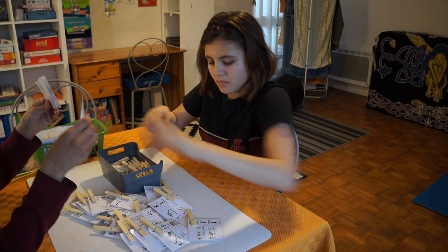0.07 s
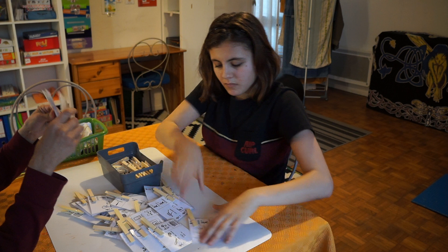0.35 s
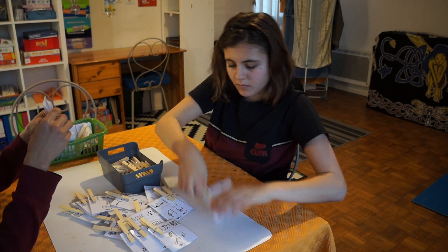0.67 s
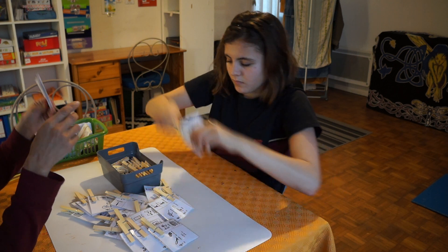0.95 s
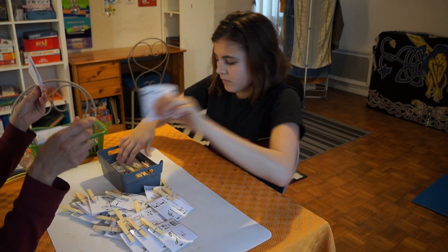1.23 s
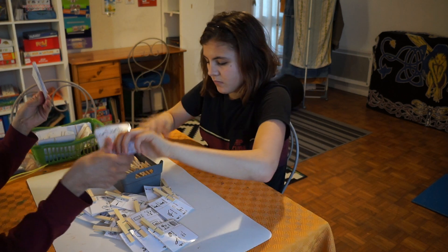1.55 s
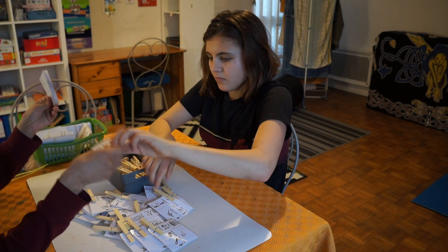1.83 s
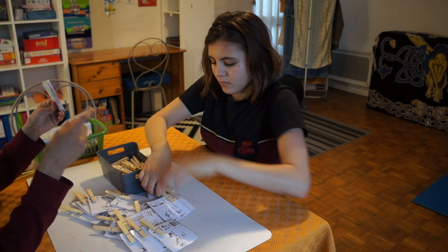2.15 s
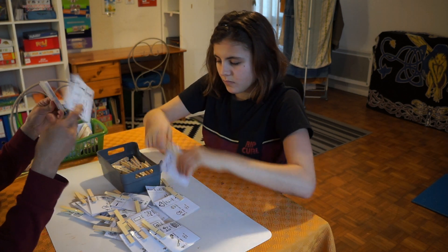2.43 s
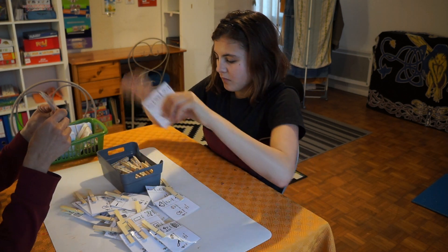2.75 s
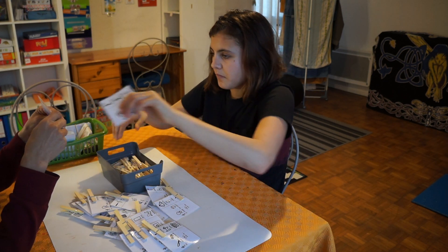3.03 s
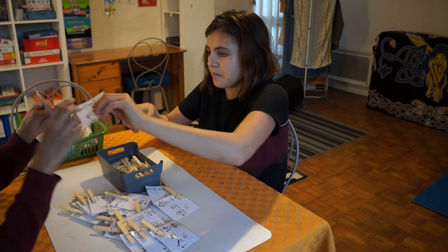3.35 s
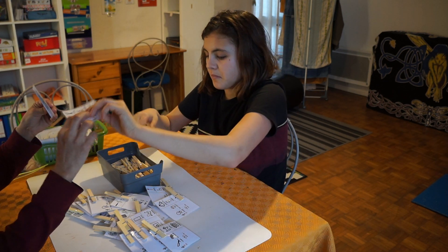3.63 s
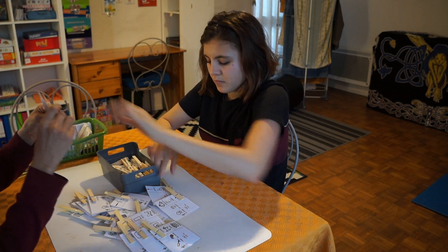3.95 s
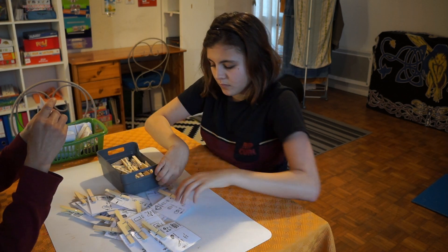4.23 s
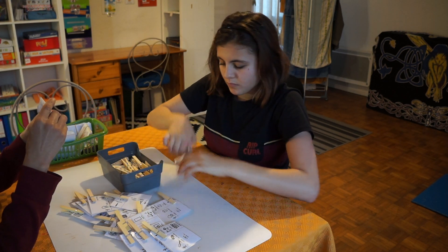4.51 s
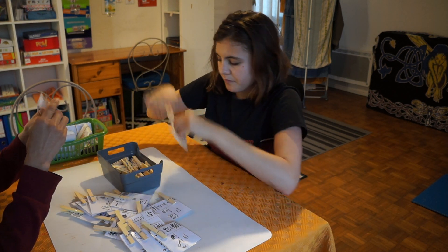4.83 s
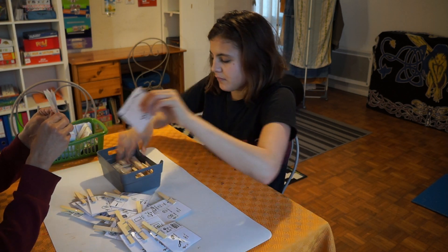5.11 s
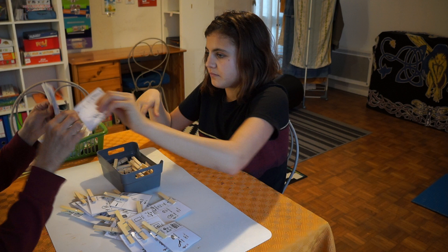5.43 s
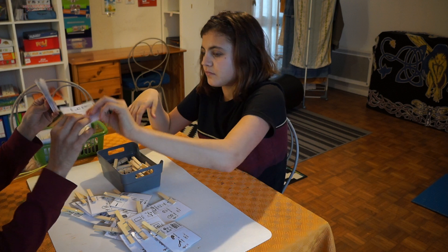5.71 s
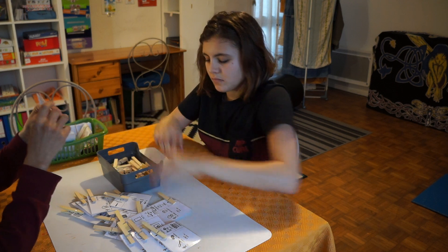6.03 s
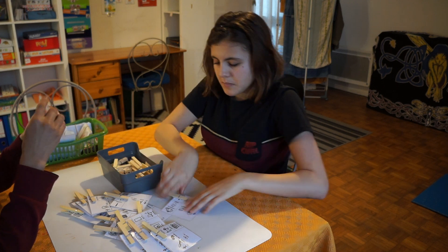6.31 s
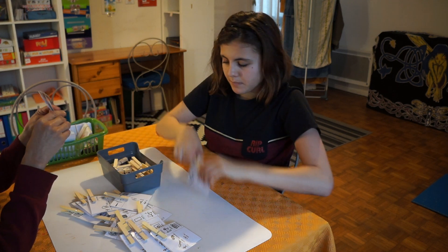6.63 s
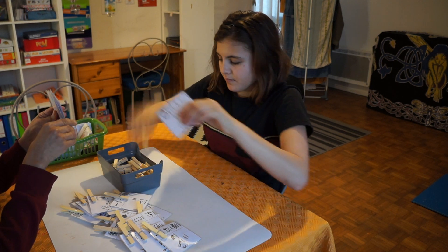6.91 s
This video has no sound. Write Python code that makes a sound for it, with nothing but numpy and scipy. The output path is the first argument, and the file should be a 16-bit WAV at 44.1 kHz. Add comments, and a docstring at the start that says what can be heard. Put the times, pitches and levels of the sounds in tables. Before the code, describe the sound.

Paper cards slide and flex softly as wooden clothespins are unclipped, their jaws clicking shut, once with a bright spring ping. The pegs land in a small plastic box in four main bursts of sharp clacks, hollow knocks and brief rattles, with more card handling in between. The microphone picks it up in narrow stereo, a touch to the left, with light living room reverberation over a faint low rumble and hiss.

```python
"""A live living room, at a table: wooden clothespins are unclipped from paper cards and dropped into a
small plastic box of pegs. Each drop clacks on the pegs, rings the box and thuds into the table; loose
pegs rock and settle. Between drops, cards slide with a grainy hiss and buckle with a hollow pop, jaws
click shut, and twice a steel spring pings. The room answers each sound, in narrow stereo."""
import sys
import numpy as np
from scipy import signal
from scipy.fft import rfft, irfft, next_fast_len
from scipy.io import wavfile
from scipy.ndimage import uniform_filter1d, map_coordinates

SR = 44100
rng = np.random.default_rng(int(sys.argv[2]) if len(sys.argv) > 2 else 0)


def transcribe(u):
    """Save the signal u as a 16-bit wav file named by the first command-line argument.

    u: samples, shape (n,) or (channels, n), limited to [-1, 1]; the rate is SR.
    q: integer samples, one column per channel.
    """
    v = np.clip(np.atleast_2d(u).T, -1, 1)
    q = np.round(v * 32767).astype(np.int16)
    wavfile.write(sys.argv[1], SR, q)


N = 315756
GRID_HZ = np.fft.rfftfreq(8192, 1 / SR)

# Levels in a table are relative; each source adds its own gain.
# room tone: freq_hz, level_db
ROOM_TONE = [(12, -33), (20, -18), (69, -4), (157, -9.5), (227, -6), (280, -6.5), (439, -8.5), (688, -17),
             (745, -8.5), (806, -12), (1110, -12), (5540, -18.5), (8670, -15), (11000, -24), (14300, -85),
             (22000, -120)]
# room tone width: freq_hz, side_re_mid_db
ROOM_TONE_WIDTH = [(60, -40), (110, -8), (190, -7), (350, -2), (620, 7), (1110, 4), (1990, 2.5),
                   (3570, -2.5), (6390, -8), (11500, -8)]
# reverberation: freq_hz, t60_s
ROOM_DECAY = [(120, 0.438), (400, 0.69), (1200, 0.41), (3000, 0.44), (7000, 0.395), (11000, 0.31)]

# landings: start_s, level_db, hardness (0 sinks to the floor, 1 wood on wood), thud_re_walls_db
DROPS = [(0.0024, -23, 0.12, -18), (1.2494, -13.5, 1, -26.5), (1.2654, -13, .55, -23),
         (1.3214, -19.5, 0.43, -35), (1.5124, -18.5, 0.34, -29), (1.5324, -20.5, 0.64, -19.5),
         (2.8946, -10.5, 0.72, -17.5), (3.0378, -10, 0.54, -38), (3.0744, -17, 0.54, -22),
         (3.0963, -15, 0.61, -30), (5.1064, -12.5, 0.94, -25), (5.1134, -20.5, 0.84, -11.5),
         (5.2214, -17, .05, -44), (5.242, -11.5, 0.45, -38), (5.328, -27, 0.57, -19),
         (7.0044, -15, .85, -16), (7.009, -13, 0.95, -16.5), (7.0239, -16, 0.85, -23.5),
         (7.0436, -16, 0.56, -41), (7.1053, -12.5, 0.29, -30), (7.1497, -18, 0.44, -27)]
# box wall modes: freq_hz, width_hz, level_db
BOX_WALL_MODES = [(930, 27, -8), (985, 143, 2), (1109, 30, 7.5), (1188, 300, 1.5), (1437, 220, 5),
                  (1480, 156, -3.5), (1670, 140, 1), (1796, 140, -0.5), (1996, 410, -2), (2280, 127, -13)]
# box floor modes: freq_hz, width_hz, level_db
BOX_FLOOR_MODES = [(536.3, 75, -10.5), (632.5, 63, -1), (688, 64, 1), (779.5, 65, 2.5), (890, 146, 1)]
# peg contact: freq_hz, level_db
PEG_SPECTRUM = [(60, -89), (300, -20.5), (1000, -11.5), (2000, 3), (3500, 1.5), (4500, 1.5), (5500, 0.5),
                (7200, 3), (8500, 2), (11000, -10.5)]
# table thud under the box: freq_hz, level_db
THUD_SPECTRUM = [(30, -50), (80, -37), (108, -11), (133, 2.5), (165, -5.5), (235, -4), (340, -0.5),
                 (480, -5), (900, -39), (3000, -63.5)]

# card over the table or out of a peg's jaws: start_s, length_s, level_db, scrape_db (high when pressed)
STROKES = [(0.08, 0.12, -60.5, -10), (0.35, 0.13, -51.5, -0.5), (0.494, 0.35, -49, -1.5),
           (0.975, 0.051, -43, -19), (1.116, 0.12, -57, -12), (1.78, 0.15, -51, -8), (2.047, .38, -54.5, 3),
           (2.57, 0.11, -52, -4.5), (3.696, .2, -54, -11), (4.095, 0.51, -49, 0.5),
           (4.716, 0.24, -54, -7.5), (5.737, 0.15, -57, -20), (5.862, 0.095, -50, 7.5),
           (6.0, 0.21, -56.5, -6), (6.197, 0.11, -45.5, 5), (6.322, 0.43, -44.5, -2)]
# card face: freq_hz, level_db
HISS_SPECTRUM = [(800, -41), (2500, -8.5), (4000, -3), (5500, -3.5), (8000, 2.5), (9500, -6.5),
                 (11000, -14)]
# card body: freq_hz, level_db
SCRAPE_SPECTRUM = [(50, -12), (140, -4.5), (400, -6), (900, 2.5), (2000, 3), (3200, 1), (7000, -28)]

# pegs clicking in the hand: start_s, level_db, wood_hz, knock_db, tilt_db_per_oct
CLICKS = [(0.397, -36.5, 1720, -11, -1), (0.4929, -34.5, 2100, -7.5, -5), (0.5536, -31.5, 2400, -10, -3),
          (0.7832, -30.5, 2170, -6, -3.5), (0.8774, -32.5, 1910, -31, 0), (0.969, -32, 1530, -33, 0.5),
          (1.0275, -19, 1510, -9.5, 2.5), (1.2085, -23.5, 2080, -18, 2.5), (1.8504, -34, 1870, -6.5, -5.5),
          (1.8907, -27, 2320, -12.5, -1.5), (2.0402, -35.5, 1400, -2.5, -3), (2.1931, -24, 2360, -30, -3),
          (2.4141, -27.5, 1940, -4, -1), (2.5543, -36.5, 1420, -10, -1), (2.67, -19.5, 2240, -22, -2.5),
          (3.6532, -43, 1500, -8.5, -2), (3.9885, -30.5, 1520, -9.5, 0.5), (4.1097, -22.5, 2170, -8.5, -6),
          (4.1833, -28, 2140, -7.5, -2), (4.2483, -32, 1655, -25, -5), (4.3631, -23, 1900, -9, -4),
          (4.4665, -22, 2400, -33.5, -2.5), (4.5219, -22, 1830, -28, 2), (4.5336, -14.5, 2100, -12, -3.5),
          (4.891, -15.5, 1790, -16.5, 12), (5.675, -46, 1510, -2, 1), (5.856, -30.5, 1994, -28, 2.5),
          (6.1819, -32.5, 1910, -6, -0.5), (6.4513, -21, 1880, -16, -4), (6.6356, -24.5, 1926, -10, -2),
          (6.7786, -11, 1560, -26.5, 1)]
# peg wood modes: ratio to wood_hz, width_hz, level_db
PEG_MODES = [(1, 436, 7.5), (1.5, 424, 1), (2.85, 400, -8)]
# tabletop knock: freq_hz, level_db
KNOCK_SPECTRUM = [(40, -61), (140, -4), (350, 11.5), (800, 11.5), (1300, 11), (3000, -26), (9000, -60)]

# cards buckling, hands bumping the table: start_s, level_db, pop_hz, bump_db, bump_hz
FLEXES = [(0.789, -29, 960, -10.5, 347), (1.541, -26.5, 980, -18, 220), (2.371, -36.5, 1560, -3.5, 464),
          (2.446, -23, 974, -10, 490), (3.998, -27.5, 1075, -35, 463), (4.897, -23.5, 1500, -19, 318),
          (5.883, -34.5, 686, -10.5, 413), (6.23, -31, 1100, -16, 537), (6.67, -15, 1180, -21.5, 377)]
# hand on the table: freq_hz, level_db
BUMP_SPECTRUM = [(40, -42), (140, -16), (260, -2.5), (350, 1), (470, -3), (620, -20), (950, -15),
                 (1450, -2), (2200, -31), (8000, -54)]

# pegs settling after a landing: start_s, length_s, initial_db
TUMBLES = [(1.3, .17, -32), (2.94, .095, -23), (3.038, .08, -21.5), (5.151, .07, -24), (5.241, .1, -22.5),
           (7.039, .11, -24.5)]

# spring pings: start_s, level_db
PINGS = [(1.8894, -34), (2.672, -8.5)]
# steel spring modes: freq_hz, width_hz, level_db
SPRING_MODES = [(2280, 290, -5), (3350, 140, 3), (4860, 200, -4), (6110, 170, 4), (7600, 150, -4)]


def amp(db):
    """Decibels to gain."""
    return 10 ** (np.asarray(db) / 20)


def unit_rms(x):
    """Scale to rms 1."""
    return x / np.sqrt(np.mean(x ** 2) + 1e-20)


def unit_energy(x):
    """Scale to energy 1."""
    return x / (np.linalg.norm(x) + 1e-20)


def along(points, hz):
    """Interpolate (freq_hz, value) points on a log axis."""
    freqs_hz, values = np.transpose(points)
    return np.interp(np.log(hz + 1), np.log(freqs_hz), values)


def wobble(knots_per_s):
    """Smooth random curve."""
    return map_coordinates(rng.standard_normal(N // 20), [np.arange(N) * knots_per_s / SR], mode="wrap")


def filtered(x, gain):
    """Apply gain(hz), zero phase."""
    size = next_fast_len(N + SR // 2)
    return irfft(rfft(x, size) * gain(np.fft.rfftfreq(size, 1 / SR)), size)[..., :N]


def noise(spectrum):
    """Steady coloured noise, rms 1."""
    return unit_rms(filtered(rng.standard_normal(N), lambda hz: amp(along(spectrum, hz))))


def add(track, start_s, sound):
    """Mix a sound into a stereo track."""
    start = max(round(start_s * SR), 0)
    part = track[:, start:start + sound.shape[1]]
    part += sound[:, :part.shape[1]]


def colour(spectrum, tilt_db_per_oct=0):
    """Power spectrum, sum 1; harder contact tilts the treble up."""
    octaves = np.log2(np.clip(GRID_HZ, SR / 20, None))
    power = amp(along(spectrum, GRID_HZ) + tilt_db_per_oct * octaves) ** 2
    return power / power.sum()


def resonances(modes):
    """Power spectrum of damped modes, sum 1."""
    hz, width_hz, db = np.transpose(modes)[:, :, None]
    detuning = (GRID_HZ - hz) / (.5 * width_hz)
    power = np.sum((amp(db) / (1 + detuning ** 2)) ** 2, axis=0)
    return power / power.sum()


def uneven(power, depth_db, spacing_hz=170):
    """Spectral ripple: each peg and contact point favours other modes."""
    ripple = map_coordinates(rng.standard_normal(512), [GRID_HZ / spacing_hz], mode="wrap")
    rippled = power * amp(depth_db * np.tanh(ripple)) ** 2
    return rippled / rippled.sum()


def blow(*parts):
    """Minimum-phase ring of one blow on several (level_db, power spectrum) parts."""
    power = sum(amp(db) ** 2 * spectrum for db, spectrum in parts)
    cepstrum = irfft(np.log(power * len(power) + 1e-12) / 2)
    half = len(cepstrum) // 2
    cepstrum[1:half] *= 2
    cepstrum[half + 1:] = 0
    return irfft(np.exp(rfft(cepstrum)))


def chatter(t60_s, rise_s=0.00018, size=2048):
    """One contact as a dying flurry of tiny touches, energy 1."""
    t = np.arange(size) / SR
    fade = amp(-60 * t / t60_s) * (1 - np.exp(-t / rise_s))
    return unit_energy(rng.standard_normal(size) * fade)


def diffuse_tail(build_s):
    """Reverberation builds, then each frequency dies at its own rate."""
    hz, t, bins = signal.stft(rng.standard_normal(SR // 2), SR, nperseg=256)
    fade = amp(-60 * t / along(ROOM_DECAY, hz)[:, None])
    return unit_energy(signal.istft(bins * fade * (1 - np.exp(-t / build_s)), SR, nperseg=256)[1])


def in_room(x, tail_db, contact=np.ones(1), echo_db=-6, early_db=-3, side_db=-10, echo_s=.0056, count=16):
    """Direct contact, one near echo, early wall reflections, tail; only the tail has width."""
    mid = amp(tail_db) * diffuse_tail(build_s=0.0029)
    side = amp(tail_db + side_db) * diffuse_tail(build_s=0.00067)
    mid[:len(contact)] += contact
    mid[int(echo_s * SR):][:len(contact)] += amp(echo_db) * contact
    delays_s = rng.uniform(.007, .025, count)
    mid[(delays_s * SR).astype(int)] += amp(early_db) * unit_energy(rng.standard_normal(count) / delays_s)
    return signal.fftconvolve(x[None], np.array([mid + side, mid - side]), axes=1)


def room_tone(level_db=-61.5):
    """Low house rumble and faint microphone hiss."""
    mid = noise(ROOM_TONE)
    side = filtered(noise(ROOM_TONE), lambda hz: amp(along(ROOM_TONE_WIDTH, hz)))
    return amp(level_db) * np.array([mid + side, mid - side])


def peg_drops():
    """A peg clacks on other pegs, rings the box's walls and floor, thuds through to the table."""
    out = np.zeros((2, N))
    walls, floor, table = resonances(BOX_WALL_MODES), resonances(BOX_FLOOR_MODES), colour(THUD_SPECTRUM)
    soft, hard = np.array([-10, -7.2, -13.5]), np.array([8.93, -10.5, 2.3])
    for start_s, level_db, hardness, thud_db in DROPS:
        clack_db, floor_db, tilt_db_per_oct = (1 - hardness) * soft + hardness * hard
        clack = blow((level_db + clack_db + 10.5, colour(PEG_SPECTRUM, tilt_db_per_oct)))
        box = amp(level_db + 11.5) * blow((0, walls), (floor_db, floor), (thud_db, table))
        on_pegs, on_box = chatter(t60_s=0.017), chatter(t60_s=0.012)
        add(out, start_s, in_room(clack, tail_db=1.68, contact=on_pegs, echo_db=-2, early_db=-5.5))
        # the open box radiates mostly upwards, into the room
        add(out, start_s, in_room(box, tail_db=5.5, contact=on_box))
    return out


def paper_bending(x, depth_db):
    """Bending paper shifts its resonances from moment to moment."""
    bins = signal.stft(x, nperseg=512)[2]
    patches = uniform_filter1d(rng.standard_normal(bins.shape), size=4, axis=0)
    patches = uniform_filter1d(patches, size=12, axis=1)
    return unit_rms(signal.istft(bins * amp(depth_db * unit_rms(patches)), nperseg=512)[1][:N])


def card_slides(attack_s=0.0079, release_s=0.016, swell_db_per_s=2, waver_db=2.63):
    """Paper catches and slips in tiny grains: hiss from its face, lower scrape from its body."""
    t = np.arange(N) / SR
    hiss_gain, scrape_gain = np.zeros((2, N))
    for start_s, length_s, level_db, scrape_db in STROKES:
        age_s = t - start_s
        touching = np.clip(np.minimum(age_s / attack_s, (length_s - age_s) / release_s) + .5, 0, 1)
        swell_db = swell_db_per_s * np.clip(age_s, 0, length_s)  # the hand speeds up
        stroke = touching * amp(level_db + swell_db)
        hiss_gain += stroke
        scrape_gain += stroke * amp(scrape_db)
    grain_db = 5.2 * wobble(knots_per_s=600) + 2.2 * wobble(knots_per_s=40)
    hand_speed_db = waver_db * wobble(knots_per_s=16)
    friction = unit_rms(amp(grain_db + hand_speed_db))
    face = amp(-6.5) * hiss_gain * paper_bending(noise(HISS_SPECTRUM), depth_db=1)
    body = amp(-8.5) * scrape_gain * paper_bending(noise(SCRAPE_SPECTRUM), depth_db=2)
    return in_room(friction * (face + body), tail_db=4)[:, :N]


def peg_nudges(gap_s=.11, scatter_db=9, centre_hz=1850, knock_db=-18, tilt_db_per_oct=-8):
    """Extra CLICKS rows: a sliding card nudges pegs at random, louder on firmer strokes."""
    rows = []
    for start_s, length_s, level_db, scrape_db in STROKES:
        count = int(length_s / gap_s)
        for k, (jitter, strength, pitch) in enumerate(rng.uniform(-1, 1, (count, 3))):
            nudge_s = start_s + length_s * (k + .5 + jitter / 2) / count
            nudge_db = level_db + scrape_db + 6 + scatter_db * strength
            rows.append((nudge_s, nudge_db, centre_hz * 2 ** (pitch / 3), knock_db, tilt_db_per_oct))
    return rows


def peg_clicks(slip_s=0.012, slip_db=-12, wood_db=-10.5):
    """A jaw slips briefly, then clicks shut, ringing the wood and faintly the tabletop."""
    out = np.zeros((2, N))
    for start_s, level_db, wood_hz, knock_db, tilt_db_per_oct in CLICKS + peg_nudges():
        wood = resonances([(wood_hz * ratio, width_hz, db) for ratio, width_hz, db in PEG_MODES])
        face = uneven(colour(PEG_SPECTRUM, tilt_db_per_oct), depth_db=4)
        click = amp(level_db + 13) * blow((0, face), (wood_db, wood), (knock_db, colour(KNOCK_SPECTRUM)))
        add(out, start_s, in_room(click, tail_db=-0.27, contact=chatter(t60_s=0.02)))
        swell = np.linspace(0, 1, int(slip_s * SR))
        slip = unit_energy(rng.standard_normal(SR // 10)[:len(swell)] * swell)
        add(out, start_s - slip_s, amp(slip_db) * signal.fftconvolve(click, slip)[None])
    return out


def card_flexes(pop_width_hz=320, bump_width_hz=80):
    """A card buckles with one hollow note over a hand's dull bump on the table."""
    out = np.zeros((2, N))
    for start_s, level_db, pop_hz, bump_db, bump_hz in FLEXES:
        note = resonances([(pop_hz, pop_width_hz, 0)])
        thump = resonances([(bump_hz, bump_width_hz, 0)])
        pop = blow((0, note), (bump_db + 6.5, thump), (bump_db + 6, colour(BUMP_SPECTRUM)))
        add(out, start_s, amp(level_db + 12.5) * in_room(pop, tail_db=1))
    return out


def pegs_settling(knocks_per_s=80, fade_db_per_s=69, scatter_db=3, count=20):
    """Loose pegs rock against the box in small, uneven knocks, each on other modes."""
    out = np.zeros((2, N))
    walls, floor = resonances(BOX_WALL_MODES), resonances(BOX_FLOOR_MODES)
    tick = colour(PEG_SPECTRUM, tilt_db_per_oct=-3)
    for start_s, length_s, initial_db in TUMBLES:
        jitter, strength = rng.standard_normal((count, 2)).T
        ages_s = np.abs(np.arange(count) + .35 * jitter) / knocks_per_s
        levels_db = initial_db - fade_db_per_s * ages_s + scatter_db * np.tanh(strength) + 12
        for age_s, level_db in zip(ages_s, levels_db):
            struck = uneven(walls, depth_db=4.5)
            if age_s < length_s:
                knock = blow((0, struck), (-4.5, floor), (-15, tick))
                add(out, start_s + age_s, amp(level_db) * knock[None])
    return in_room(out[0], tail_db=6.5)[:, :N]


def spring_pings():
    """A peg snapping shut in the air leaves its steel spring ringing."""
    out = np.zeros((2, N))
    ring = blow((0, resonances(SPRING_MODES)))
    for start_s, level_db in PINGS:
        add(out, start_s, amp(level_db) * in_room(ring, tail_db=0.5))
    return out


def scene():
    """Pegs and cards, a touch to the left, over room tone."""
    table = peg_drops() + pegs_settling() + card_flexes() + card_slides() + spring_pings() + peg_clicks()
    return table * amp([[.12], [-.12]]) + room_tone()


def record(dry):
    """Steep low-pass."""
    cutoff_hz = 11120
    return filtered(dry, lambda hz: 1 / np.sqrt(1 + (hz / cutoff_hz) ** 260))


dry = scene()
out = record(dry)
transcribe(out)
```